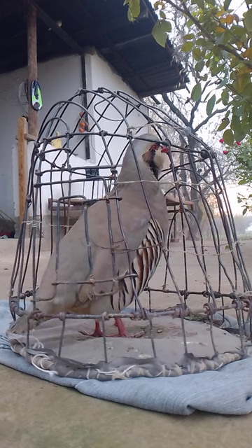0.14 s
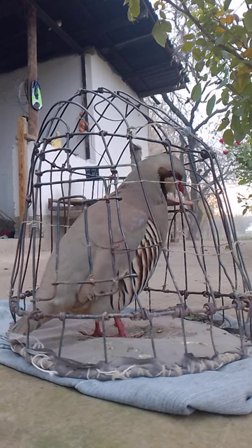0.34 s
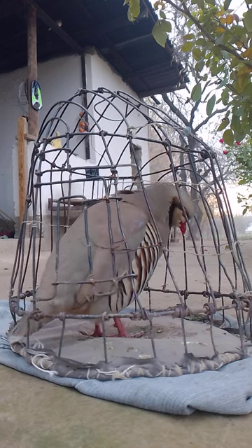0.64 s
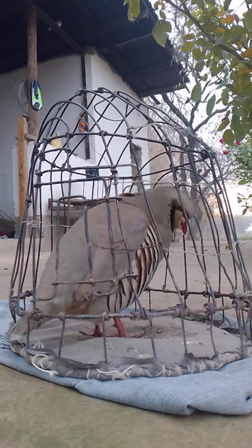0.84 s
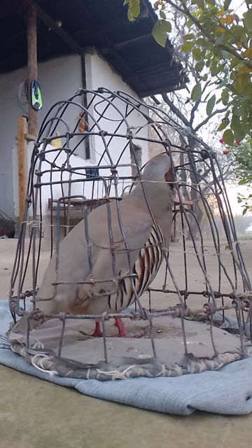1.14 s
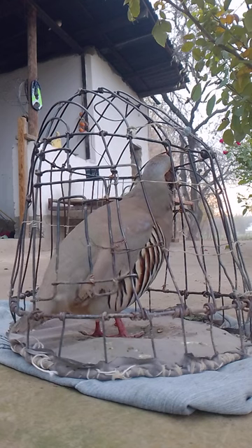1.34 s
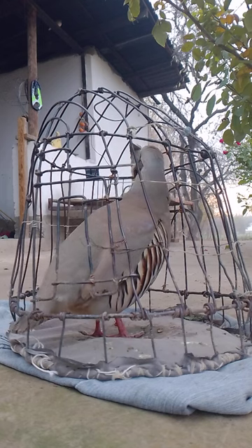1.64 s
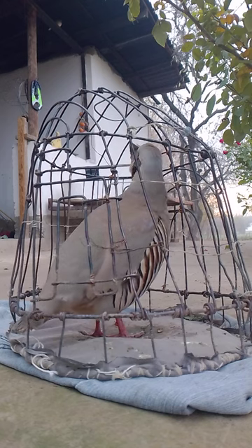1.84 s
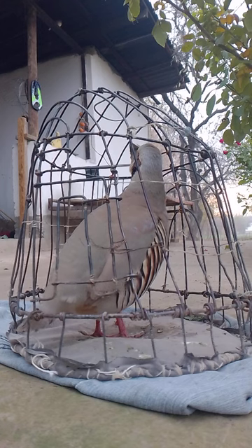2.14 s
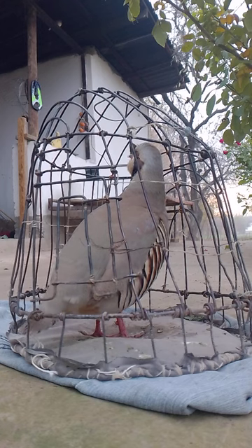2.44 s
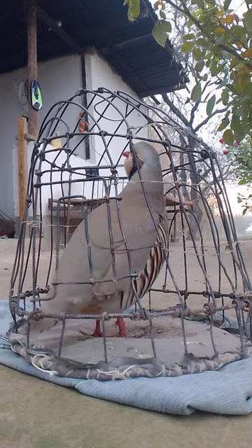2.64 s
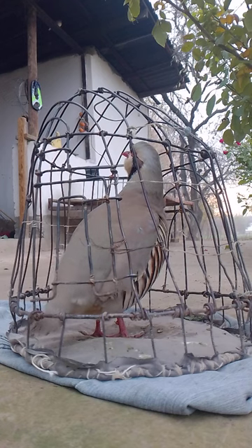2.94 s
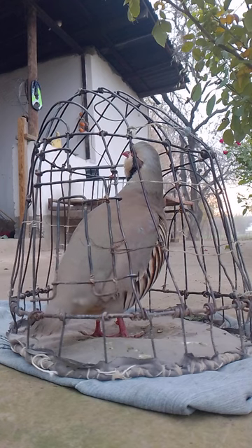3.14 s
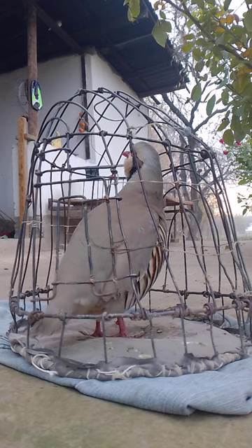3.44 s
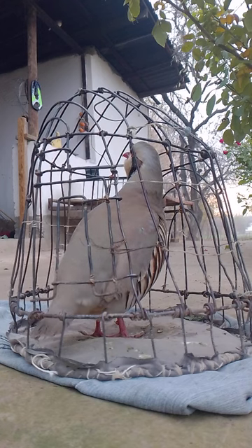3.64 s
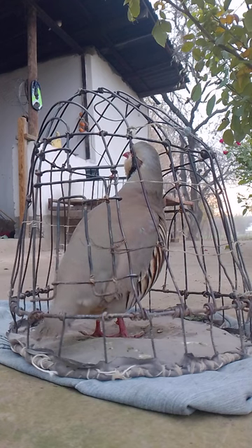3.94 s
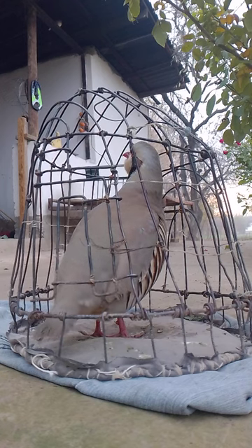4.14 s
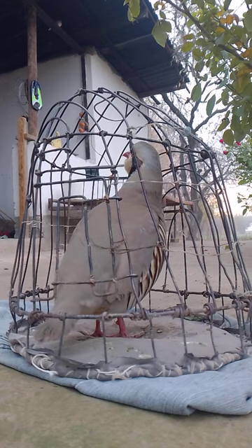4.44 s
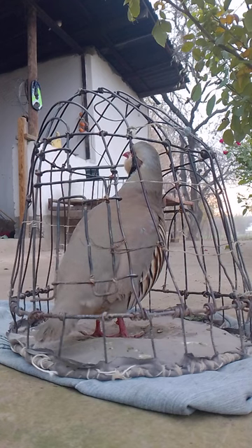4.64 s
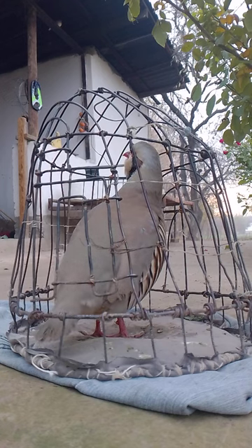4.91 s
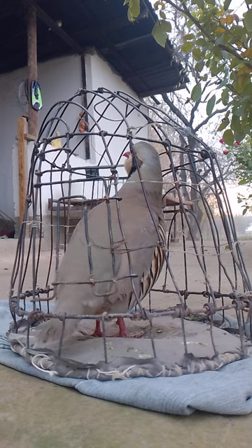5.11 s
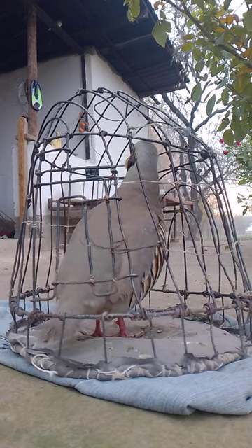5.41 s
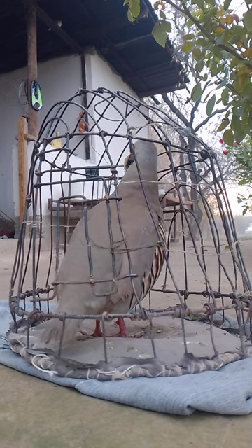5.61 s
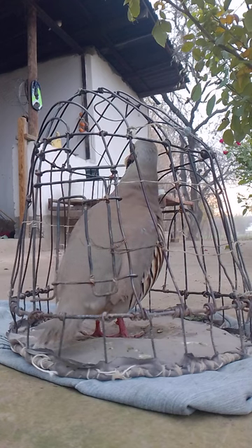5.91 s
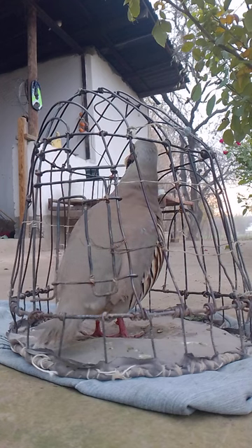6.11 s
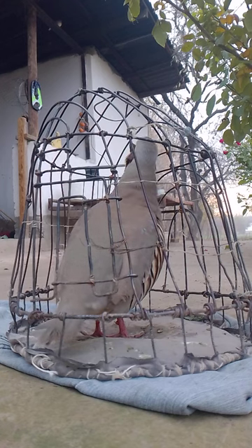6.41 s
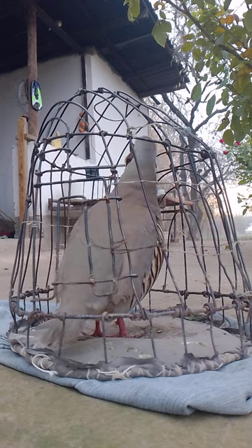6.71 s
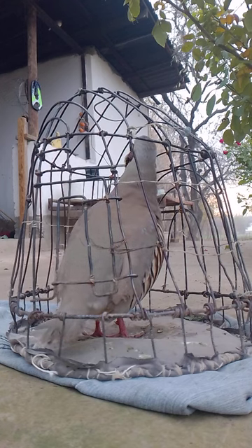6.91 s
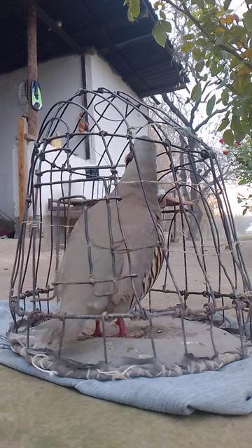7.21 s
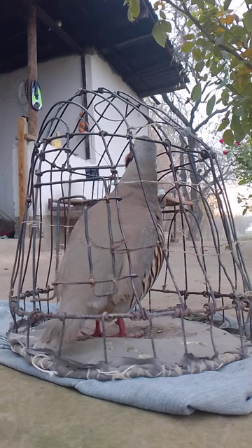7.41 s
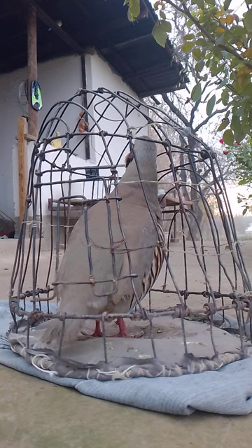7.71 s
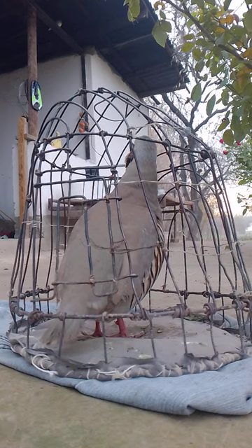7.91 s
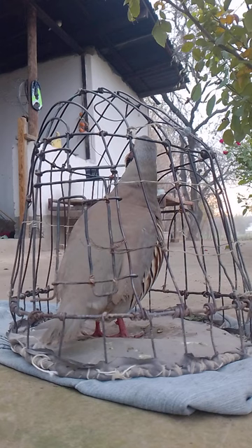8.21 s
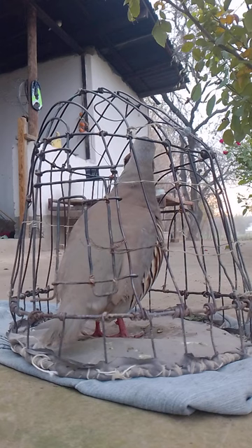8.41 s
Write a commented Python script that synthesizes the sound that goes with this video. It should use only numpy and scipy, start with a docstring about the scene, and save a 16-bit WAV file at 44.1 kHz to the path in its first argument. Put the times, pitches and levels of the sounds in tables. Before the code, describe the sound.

A caged partridge close by calls in hoarse clucks and harsh, choppy ringing notes, easing midway then returning louder, in a walled yard.

```python
"""Chukar partridge in a walled yard

A caged bird calls close by: short hoarse clucks, and longer notes that the catching airflow chops into puffs.
The syrinx buzzes at roughly 500-1000 Hz; its second harmonic carries the note, and under more pressure
it flips to a clear third. Each note ends in a falling rasp made of the second harmonic and breath noise.
A soft sinking moan and a feather rustle are heard too. Walls return a short tail of filtered noise, and
faint falling whistles come from far off over outdoor air and a distant low drone that dies away.
"""
import sys
import numpy as np
from scipy import signal
from scipy.fft import rfft, irfft, next_fast_len
from scipy.io import wavfile
from scipy.ndimage import uniform_filter1d, minimum_filter1d, map_coordinates

SR = 44100
rng = np.random.default_rng(int(sys.argv[2]) if len(sys.argv) > 2 else 0)


def dump_mix(stems):
    """Bounce the given channels to the path in sys.argv[1] as a 16-bit WAV at rate SR."""
    frames = np.atleast_2d(stems).T  # one column per channel
    limited = np.clip(frames, -1, 1)  # hard clip at full scale
    pcm = np.round(limited * 32767).astype(np.int16)
    wavfile.write(sys.argv[1], SR, pcm)


N = 377496

# long notes, levels at full pressure: start t/s, climb t/s, ring t/s, fall t/s, ringing tone f/Hz,
# climb level/dB, ring level/dB, fall level/dB, roughness of the ring [0-1]
LONG_NOTES = [(0.192, 0.044, 0.0034, 0.051, 2575, -20, -26, -23.5, 0.2),
              (0.457, 0.056, 0.033, 0.036, 2594, -19.5, -14.5, -19.5, 0.14),
              (0.857, 0.029, 0.052, 0.036, 2527, -17.5, -13.5, -20.5, 0.12),
              (1.265, .021, .060, .035, 2560, -18, -11.5, -18, 0.07),
              (1.525, .027, .088, 0.047, 2655, -17.5, -11, -20.5, .08),
              (1.981, 0.02, 0.064, 0.032, 2523, -19.5, -13.5, -20.5, 0.12),
              (2.267, .023, 0.085, 0.049, 2617, -16.5, -10, -18.5, 0.08),
              (2.759, 0.048, 0.0079, 0.031, 2230, -19, -20, -20.5, 0.31),
              (3.973, 0.045, 0.025, .072, 2294, -15.5, -18.5, -24.5, 0.14),
              (4.258, .041, 0.045, .040, 2324, -19.5, -16.5, -21.5, 0.17),
              (4.544, 0.05, 0.032, 0.043, 2295, -16.5, -19, -19.5, 0.22),
              (4.949, 0.043, 0.0042, 0.047, 2220, -17, -20, -18.5, .2),
              (5.240, .043, .048, .035, 2402, -16.5, -15, -24, 0.13),
              (5.633, .023, .041, .046, 2300, -15, -11.5, -18, 0.17),
              (5.886, 0.044, 0.074, 0.039, 2458, -13.5, -11.5, -19, 0.13),
              (6.312, 0.025, 0.052, 0.037, 2424, -14, -9.5, -19, 0.2),
              (6.593, .041, 0.057, 0.041, 2479, -11.5, -10, -19, 0.18),
              (7.017, .022, 0.057, 0.04, 2500, -17, -9, -19.5, .16)]
# moments when a note overblows: start t/s, end t/s
OVERBLOWN_SQUEALS = [(1.601, 1.626), (2.338, 2.364)]
SQUEAL_HZ, SQUEAL_DB, SQUEAL_ROUGH, SQUEAL_BRIGHT_DB = 2780, -13.5, 0.13, 1.5
OVERLAP_S = 0.004  # each part of a note reaches this far into its neighbours
# tone at start, middle and end; roughness from start to end
CLIMB_HZ, CLIMB_ROUGH = (1327, 1513, 1740), (0.66, 0.15)
FALL_HZ, FALL_ROUGH = (1691, 1263, 1010), (0.34, 0.9)
# pitch as a share of the ringing tone; level change by the end
RING_PITCH, RING_FADE_DB = (0.85, 1.01, 0.87), -3.5
RING_FRAYS = 0.074  # roughness added at both ends of the ring, where pressure is low
# upper harmonics against the lower three
CLIMB_BRIGHT_DB, FALL_BRIGHT_DB, RING_BRIGHT_DB = -6, -5.5, -10.5
BRIGHT_DB_PER_ROUGH = 36  # a rougher ring is brighter
FORCE_BRIGHTENS, USUAL_RING_DB = 0.54, -10.5  # so is a harder one: dB gained per dB above the usual level


def notes():
    """Each note climbs hoarsely on its second harmonic, flips to a ringing third and falls away in a rasp."""
    flow = airflow()
    out, overblown = np.zeros(N), np.zeros(N)

    # a squeal keeps the third harmonic, under strong upper ones, and replaces the ring meanwhile
    for start, end in OVERBLOWN_SQUEALS:
        overblown[int(start * SR):int(end * SR)] = 1
        at = start - OVERLAP_S
        tone_hz = np.full(int((end + OVERLAP_S - at) * SR), SQUEAL_HZ)
        squeal = blow(at, tone_hz, 3, flow, SQUEAL_ROUGH, SQUEAL_BRIGHT_DB, rise_s=0.0072, fall_s=0.014,
                      steepness=1, tone_db=30.5, overtone_db=-8, jitter=0.13, hiss_db=13)
        add(out, at, from_db(SQUEAL_DB) * squeal)
    ring_flow = flow * np.clip(1 - uniform_filter1d(overblown, int(OVERLAP_S * SR)), 0, 1)

    for start, climb_s, ring_s, fall_s, ring_hz, climb_db, ring_db, fall_db, rough in LONG_NOTES:
        flip = start + climb_s
        drop = flip + ring_s

        tone_hz = arch(start, flip + OVERLAP_S, CLIMB_HZ)
        climb_rough = np.linspace(*CLIMB_ROUGH, len(tone_hz))
        climb = blow(start, tone_hz, 2, flow, climb_rough, CLIMB_BRIGHT_DB, rise_s=0.015, fall_s=0.007,
                     steepness=2.23, tone_db=31, overtone_db=20, jitter=0.056, hiss_db=15)
        add(out, start, from_db(climb_db) * climb)

        at = flip - OVERLAP_S
        tone_hz = ring_hz * arch(at, drop + OVERLAP_S, RING_PITCH)
        frayed = rough + RING_FRAYS * np.linspace(-1, 1, len(tone_hz)) ** 4
        bright_db = RING_BRIGHT_DB + BRIGHT_DB_PER_ROUGH * rough
        bright_db += FORCE_BRIGHTENS * (ring_db - USUAL_RING_DB)
        ring = blow(at, tone_hz, 3, ring_flow, frayed, bright_db, rise_s=0.0047, fall_s=0.0068,
                    steepness=2.8, tone_db=33, overtone_db=27.5, jitter=0.056, hiss_db=15)
        fade_db = RING_FADE_DB * np.linspace(0, 1, len(ring)) ** 2
        add(out, at, from_db(ring_db + fade_db) * ring)

        at = drop - OVERLAP_S
        tone_hz = arch(at, drop + fall_s, FALL_HZ)
        fall_rough = np.linspace(*FALL_ROUGH, len(tone_hz))
        fall = blow(at, tone_hz, 2, flow, fall_rough, FALL_BRIGHT_DB, rise_s=0.0073, fall_s=0.0044,
                    steepness=2.59, tone_db=26.5, overtone_db=16, jitter=0.056, hiss_db=15)
        add(out, at, from_db(fall_db) * fall)
    return out


# throat with open beak: f/Hz, level/dB
OPEN_THROAT = [(300, -48.5), (550, -13.5), (1150, -1.5), (1550, 4.5), (2300, 2), (3000, 2), (3900, 1),
               (4800, -13.5), (5600, -19.5), (7000, -30.5), (8800, -47), (10500, -38), (15500, -51.5)]
CATCH_SAG, RECOVER_S = 0.12, 0.0037  # share of pitch lost in a catch, and how fast it comes back
RATTLE_DB, RATTLE_HZ = 2, 407  # a rough voice comes in uneven pulses
WANDER, WANDER_HZ = 0.014, 71  # share by which the pitch strays, and how often


def blow(start, tone_hz, register, flow, rough, bright_db, rise_s, fall_s, steepness,
         tone_db, overtone_db, jitter, hiss_db):
    """One part of a note: loudness follows pitch, and the cleaner the voice, the more one harmonic rules."""
    count = len(tone_hz)
    flow = flow[int(start * SR):][:count]
    rough = np.clip(rough, 0, 1)
    pressure = swell(count, rise_s, fall_s) * flow * (tone_hz / tone_hz.max()) ** steepness
    pressure = pressure * from_db(RATTLE_DB * rough * flutter(count, RATTLE_HZ))
    # the pitch sags behind each catch
    lag = np.exp(-1 / (RECOVER_S * SR))
    sag = CATCH_SAG * signal.lfilter([1 - lag], [1, -lag], 1 - flow)
    hz = tone_hz / register * (1 - sag) * (1 + WANDER * flutter(count, WANDER_HZ))
    clean = (1 - rough) ** 3
    voice = syrinx(hz, pressure, OPEN_THROAT, rough, bright_db, register, tone_db * clean,
                   overtone_db * clean ** 2, jitter, scatter=0.54, hiss_db=hiss_db, spread=0.51)
    return voice * np.sqrt(np.mean(pressure ** 2))


# catches of the airflow that chop a note into puffs: middle t/s, length t/s
AIRFLOW_CATCHES = [(0.246, 0.021), (0.275, 0.019), (0.514, 0.016), (0.536, .025), (0.893, 0.013),
                   (0.916, 0.027), (1.549, 0.023), (1.632, 0.02), (2.040, .013), (2.29, 0.016),
                   (2.367, 0.023), (2.804, .017), (4.019, 0.028), (4.045, .019), (4.092, .013),
                   (4.277, 0.0186), (4.3, 0.016), (4.327, .023), (4.349, 0.013), (4.564, .020),
                   (4.591, .023), (4.615, 0.02), (4.966, 0.016), (4.993, 0.021), (5.257, .011),
                   (5.285, 0.019), (5.311, .023), (5.696, 0.015), (5.906, 0.017), (5.93, .013),
                   (5.956, .009), (5.985, 0.03), (6.378, 0.02), (6.618, .020), (6.638, .012), (6.666, .018),
                   (7.092, .012)]
SHUT_S = 0.008  # time the airflow takes to shut or reopen, so a brief catch only dents it


def airflow():
    """How open the airway is, 0-1, as it catches and reopens."""
    t, shut = np.arange(N) / SR, np.zeros(N)
    for middle, length in AIRFLOW_CATCHES:
        near = slice(int((middle - length) * SR), int((middle + length) * SR))
        shut[near] += np.maximum(0, length / 2 - np.abs(t[near] - middle)) / SHUT_S
    return np.cos(np.pi / 2 * np.minimum(shut, 1)) ** 1.3


def syrinx(hz, pressure, throat, rough, bright_db, tone, tone_db, overtone_db, jitter, scatter, hiss_db, spread):
    """Harmonics of an unsteady membrane through the throat; harmonic `tone` and its octave are weighted."""
    count = len(hz)
    unsteady = 1 + jitter * rough * flutter(count, 483) + 0.009 * flutter(count, 173.6)
    phase = 2 * np.pi * np.cumsum(hz * unsteady) / SR
    k = np.arange(1, 9)[:, None]  # harmonic numbers
    weights = gain_at(throat, k * hz) * from_db(tone_db * (k == tone) + overtone_db * (k == 2 * tone))
    # a slack membrane flaps wider, so the fundamental gains as the pitch sinks
    weights = weights * np.where(k == 1, (760 / hz) ** 3.3, 1)
    # the weaker harmonics come and go
    come_and_go = np.array([flutter(count, 130) for _ in k])
    weights = weights * from_db(2.3 * (k != tone) * come_and_go)
    # the windpipe smears each pulse
    buzz = weights * np.cos(k * phase + spread * k ** 2)
    buzz = buzz * (1 + scatter * rough * flutter(count, 800))
    # air escapes once a cycle, more as pressure builds, and carries the treble
    puffs = rng.standard_normal(count) * np.sqrt(pressure) * (1 + 0.86 * np.cos(phase))
    hiss = from_db(hiss_db) * (0.27 + rough) * colour(puffs, throat)
    split = signal.butter(4, 3.5 * hz.mean(), fs=SR, output="sos")
    low_hiss = signal.sosfiltfilt(split, hiss)
    low = buzz[:3].sum(0) + low_hiss
    high = buzz[3:].sum(0) + hiss - low_hiss
    # the upper harmonics need pressure: they come in late and leave early
    return rms_one(rms_one(low * pressure) + from_db(bright_db) * rms_one(high * pressure ** 2.3))


# clucks, levels before a common trim: start t/s, length t/s, middle pitch f/Hz, level/dB,
# upper harmonics level/dB, roughness [0-1]
HOARSE_CLUCKS = [(0.101, 0.028, 858, -20, -22, 0.19), (0.738, 0.038, 744, -29.5, -18.5, 0.47),
                 (1.182, .031, 901, -17.5, -10, 1.01), (1.89, 0.034, 899.6, -18, -12.5, 0.84),
                 (2.63, 0.036, 893.4, -17, -15, 0.65), (3.066, 0.033, 876, -20, -15, 0.49),
                 (3.391, 0.0256, 875, -24.5, -25.5, 0.44), (3.732, 0.041, 866.7, -19, -7.5, 0.41),
                 (4.859, 0.0339, 944, -17.5, -15, 0.85), (5.552, .036, 803, -17, -9, 0.42),
                 (6.23, .032, 888, -15.5, -9.5, .53), (6.927, 0.032, 847.4, -16.5, -9, 0.45),
                 (7.376, 0.03, 880, -15.5, -5.5, 0.75), (7.693, .031, 823, -15, -8, 0.4),
                 (8.008, 0.031, 661, -25.5, -12, 0.16), (8.255, 0.03, 845, -14, -7, .4)]
# throat with the beak nearly closed: f/Hz, level/dB
CLUCK_THROAT = [(280, -32), (450, -7.5), (850, 7), (1150, 0.5), (1550, 0.5), (2000, -6.5), (2700, -12),
                (3450, -8.5), (4050, -38), (4700, -24.5), (5800, -30.5), (6500, -50.5), (15500, -70.5)]
CLUCK_TRIM_DB = -3.5


def clucks():
    """One hoarse push: it starts soft and low, swells, and the rougher it is, croaks an octave down."""
    out = np.zeros(N)
    for start, length, pitch, level_db, bright_db, rough in HOARSE_CLUCKS:
        hz = arch(start, start + length, [(0.93 - 0.2 * rough) * pitch, pitch, 1.04 * pitch])
        push = swell(len(hz), rise_s=0.025, fall_s=0.0091) ** 1.13
        voice = syrinx(hz, push, CLUCK_THROAT, rough, bright_db, 1, tone_db=8.5, overtone_db=-9,
                       jitter=0.06, scatter=0.62, hiss_db=17, spread=0.98)
        half_phase = np.pi * np.cumsum(hz) / SR
        progress = np.linspace(0, 1, len(hz))
        croak = 0.8 * rough ** 2 * progress * (np.cos(half_phase) + 0.48 * np.cos(3 * half_phase))
        add(out, start, from_db(level_db + CLUCK_TRIM_DB) * rms_one(voice + croak * push))
    return out


# soft whine: start t/s, end t/s, first f/Hz, middle f/Hz, last f/Hz, level/dB, second harmonic level/dB
SOFT_WHINE = [(3.794, 3.85, 948, 914, 784.5, -25.5, -20), (3.837, 3.952, 528, 620, 427, -38.5, -2)]


def whine():
    """A soft moan of few harmonics that sinks into a lower register."""
    out = np.zeros(N)
    for start, end, *pitches, level_db, second_db in SOFT_WHINE:
        hz = arch(start, end, pitches)
        phase = 2 * np.pi * np.cumsum(hz * (1 + 0.043 * flutter(len(hz), 500))) / SR
        tone = np.sin(phase) + from_db(second_db) * np.sin(2 * phase) + from_db(-27.5) * np.sin(4 * phase)
        add(out, start, from_db(level_db) * rms_one(tone * swell(len(hz), rise_s=0.025, fall_s=0.017)))
    return out


def rustle(start=1.075, level_db=-50):
    """The bird shifts: a brief grainy brush of feathers, from multiplied noises dulled above 3.5 kHz."""
    out, count = np.zeros(N), SR // 28
    grains = rng.standard_normal(count) * rng.standard_normal(count)
    grains = signal.sosfilt(signal.butter(2, 3500, fs=SR, output="sos"), grains)
    add(out, start, from_db(level_db) * rms_one(grains) * swell(count, rise_s=0.009, fall_s=0.036) ** 2)
    return out


# gain of the bird's treble above 9.6 kHz: t/s, level/dB
TREBLE_GAIN = [(0.3, -2), (0.7, 4), (2.4, 4.5), (3.3, 0), (5.0, 2), (7.1, 0), (7.7, -4)]


def treble(x):
    """The top of the voice rises and fades as the bird moves."""
    times, db = np.transpose(TREBLE_GAIN)
    top = signal.sosfiltfilt(signal.butter(8, 9600, "high", fs=SR, output="sos"), x)
    gain = from_db(np.interp(np.arange(N) / SR, times, db))
    return x + (gain - 1) * top


# far whistles, levels without their echoes: start t/s, end t/s, first f/Hz, last f/Hz, level/dB
FAR_WHISTLES = [(6.81, 6.95, 2650, 2260, -58.5), (7.268, 7.40, 3290, 3135, -59),
                (7.758, 7.87, 3870, 3760, -63.5), (7.9, 8.147, 3434, 2165, -58.5)]


def far_whistles():
    """Falling whistles: unsteady gliding tones with soft edges, blurred by distance."""
    out = np.zeros(N)
    for start, end, first_hz, last_hz, level_db in FAR_WHISTLES:
        count = int((end - start) * SR)
        hz = np.linspace(first_hz, last_hz, count) * (1 + 0.05 * flutter(count, 760))
        phase = 2 * np.pi * np.cumsum(hz) / SR
        tone = np.sin(phase) + from_db(-32) * np.sin(2 * phase)
        add(out, start, from_db(level_db) * rms_one(tone * swell(count, rise_s=0.055, fall_s=0.063)))
    return out


# colour of the yard's tail: f/Hz, level/dB
WALL_COLOUR = [(300, 4), (900, -8), (5000, -3.5), (8000, -2), (15000, -12.5)]


def yard(x, early_db, early_t60, late_db, late_t60):
    """Ground and house wall scatter the sound at once; the wider yard answers with a longer tail."""
    t = np.arange(int(0.8 * SR)) / SR
    response = 0
    for level_db, t60, build_s in (early_db, early_t60, 0.004), (late_db, late_t60, 0.025):
        echoes = colour(rng.standard_normal(len(t)), WALL_COLOUR)
        echoes = echoes * from_db(-60 * t / t60) * (1 - np.exp(-t / build_s))
        response = response + from_db(level_db) * echoes / np.linalg.norm(echoes)
    return x + signal.fftconvolve(x, response)[:N]


# spectrum of outdoor air before its level is set: f/Hz, level/dB per Hz
AIR_COLOUR = [(25, -17), (130, -17), (165, -24.5), (260, -5), (400, -9.5), (850, -4.5), (1400, -16),
              (2500, -12.5), (3600, -19), (7000, -42.5), (15000, -52)]


def outdoor_air(level_db=-57):
    """Steady noise shaped to the colour of outdoor air."""
    return from_db(level_db) * rms_one(colour(rng.standard_normal(N), AIR_COLOUR))


def distant_drone():
    """A low band of noise that fades steadily by 7.7 dB a second."""
    band = signal.butter(3, [230, 340], "band", fs=SR, output="sos")
    drone = rms_one(signal.sosfilt(band, rng.standard_normal(N)))
    return from_db(-55.5 - 7.7 * np.arange(N) / SR) * drone


def from_db(db):
    """Amplitude factor of a level in dB."""
    return 10 ** (np.asarray(db) / 20)


def rms_one(x):
    """Scale a sound to rms 1."""
    return x / np.sqrt(np.mean(x ** 2) + 1e-20)


def gain_at(spectrum, hz):
    """Gain of a (f/Hz, level/dB) table, joined on a log-frequency axis."""
    points = np.array(spectrum)
    return from_db(np.interp(np.log(hz + 1), np.log(points[:, 0]), points[:, 1]))


def colour(x, spectrum):
    """Shape a sound by a (f/Hz, level/dB) table."""
    size = next_fast_len(len(x) + 512)
    hz = np.arange(size // 2 + 1) * SR / size
    return irfft(rfft(x, size) * gain_at(spectrum, hz), size)[:len(x)]


def flutter(count, hz):
    """Smooth random curve around zero, with hz fresh values a second."""
    knots = rng.standard_normal(512)
    return map_coordinates(knots, [np.arange(count) * hz / SR], order=2, mode="wrap")


def arch(start, end, pitches):
    """Pitch bent smoothly through its start, middle and end values."""
    curve = np.polyfit([0, 0.5, 1], pitches, 2)
    return np.polyval(curve, np.linspace(0, 1, int((end - start) * SR)))


def swell(count, rise_s, fall_s):
    """Envelope with rounded edges, rms 1."""
    t = np.arange(count) / SR
    rise = np.sin(np.pi / 2 * np.clip(t / rise_s, 0, 1))
    fall = np.sin(np.pi / 2 * np.clip(t[::-1] / fall_s, 0, 1))
    return rms_one(rise * fall)


def add(out, start, sound):
    """Mix a sound in at its time."""
    at = int(start * SR)
    out[at:at + len(sound)] += sound[:len(out) - at]


def scene():
    """The near bird and the far whistles, each with its tail, over air and drone."""
    bird = notes() + clucks() + whine() + rustle()
    # a steep low cut at 380 Hz removes the bird's lowest sound
    bird = signal.sosfilt(signal.butter(4, 380, "high", fs=SR, output="sos"), bird)
    near = yard(treble(bird), early_db=-17.5, early_t60=0.19, late_db=-25, late_t60=0.44)
    far = yard(far_whistles(), early_db=3, early_t60=0.13, late_db=-2, late_t60=0.86)
    return (near + far + outdoor_air() + distant_drone())[None]


def record(dry):
    """A fast limiter holds down the loudest peaks; the top is cut steeply."""
    ceiling_db, cutoff_hz = -5.5, 15850
    span = SR // 250  # 4 ms
    peaks = -minimum_filter1d(-np.abs(dry), span)
    gain = uniform_filter1d(np.minimum(1, from_db(ceiling_db) / (peaks + 1e-9)), span)
    steep_cut = signal.ellip(10, 0.1, 80, cutoff_hz, fs=SR, output="sos")
    return signal.sosfilt(steep_cut, dry * gain)


dry = scene()
out = record(dry)
dump_mix(out)
```